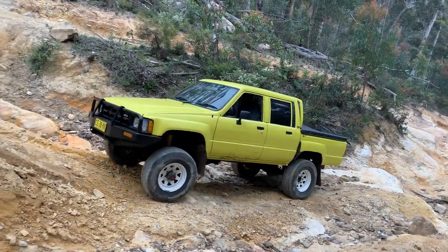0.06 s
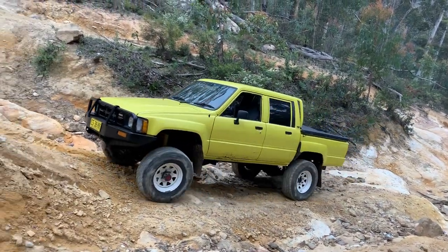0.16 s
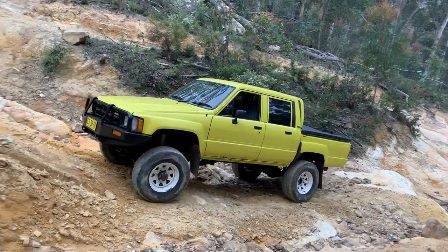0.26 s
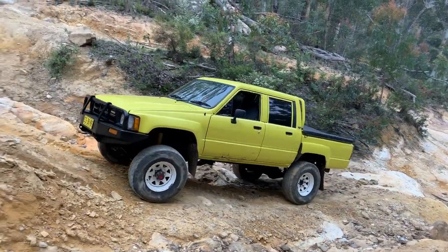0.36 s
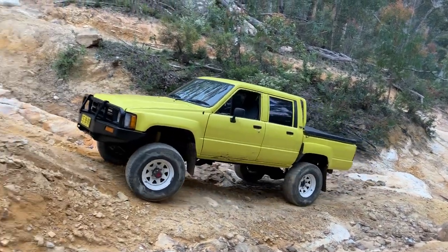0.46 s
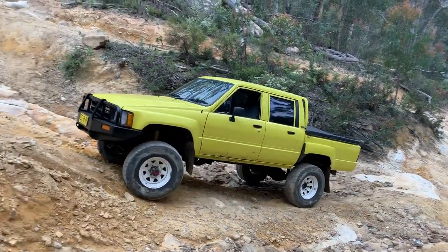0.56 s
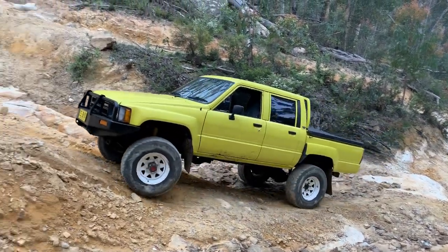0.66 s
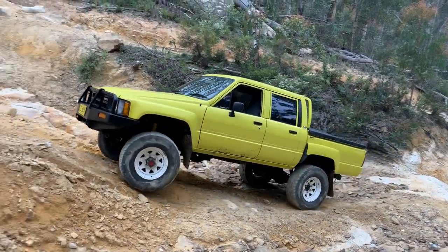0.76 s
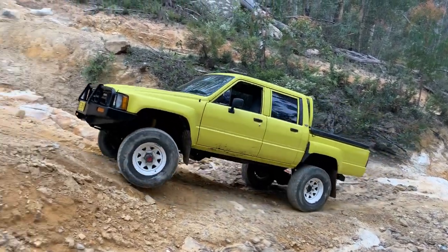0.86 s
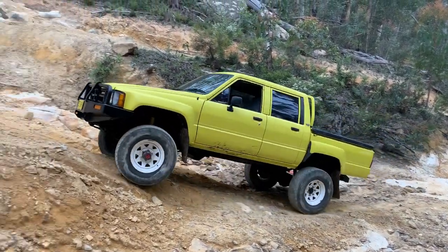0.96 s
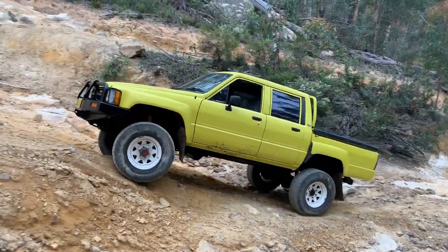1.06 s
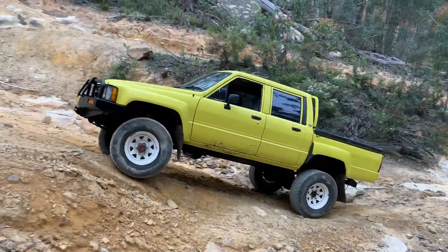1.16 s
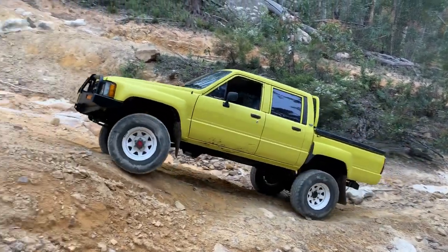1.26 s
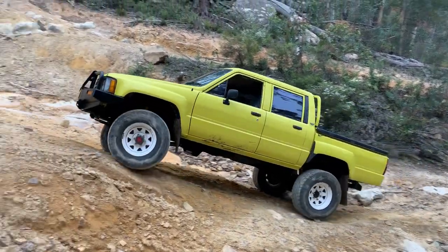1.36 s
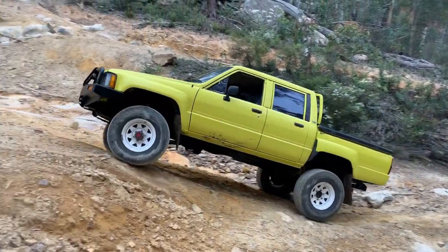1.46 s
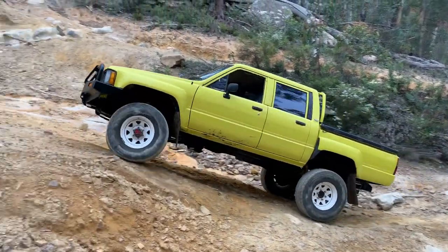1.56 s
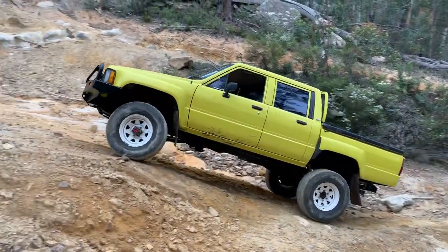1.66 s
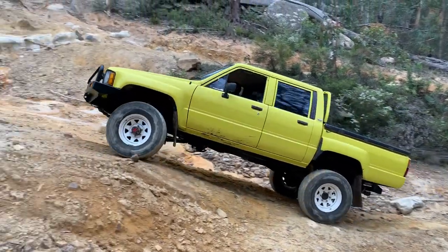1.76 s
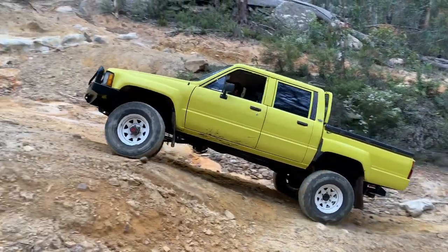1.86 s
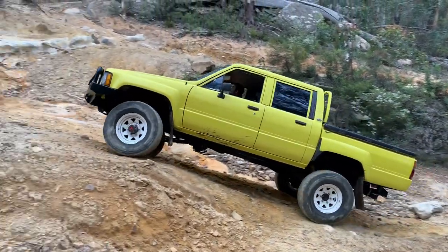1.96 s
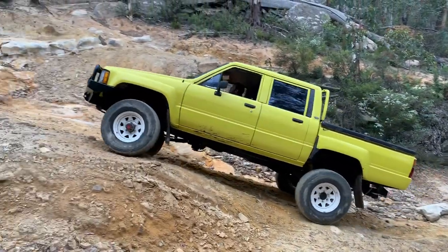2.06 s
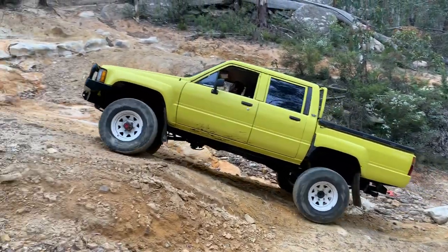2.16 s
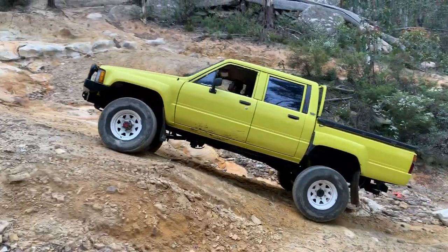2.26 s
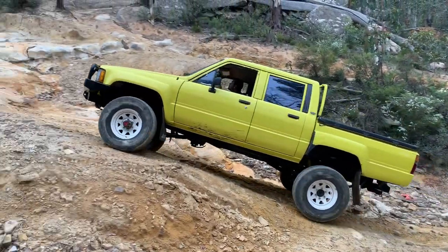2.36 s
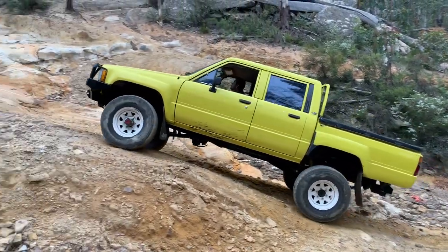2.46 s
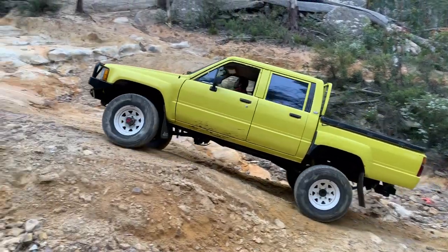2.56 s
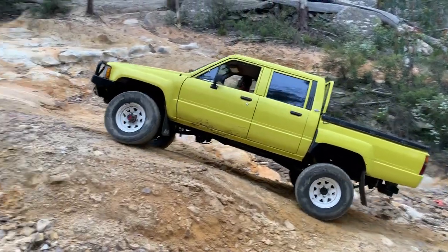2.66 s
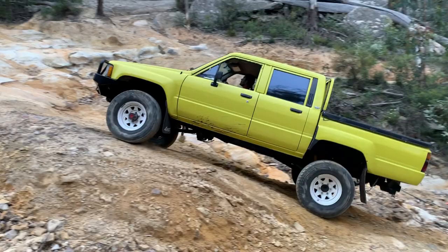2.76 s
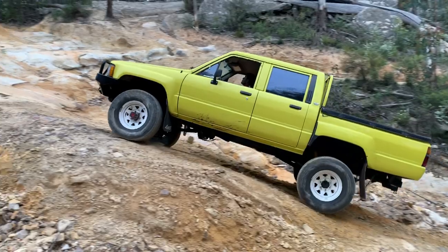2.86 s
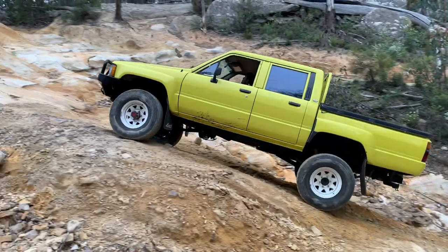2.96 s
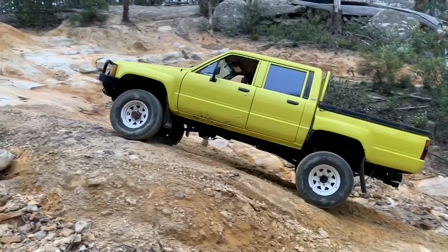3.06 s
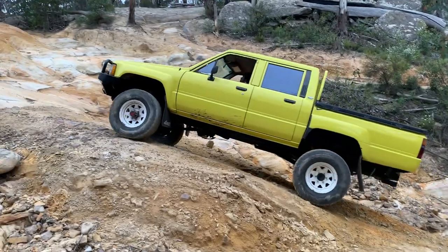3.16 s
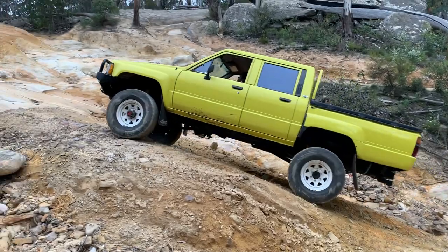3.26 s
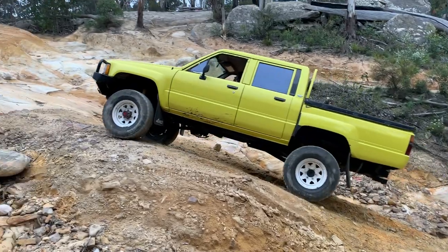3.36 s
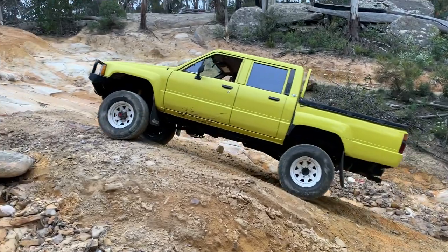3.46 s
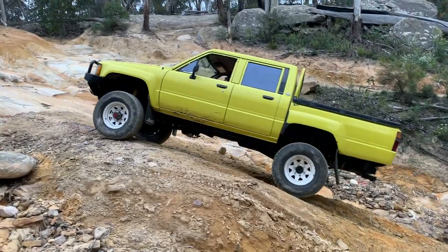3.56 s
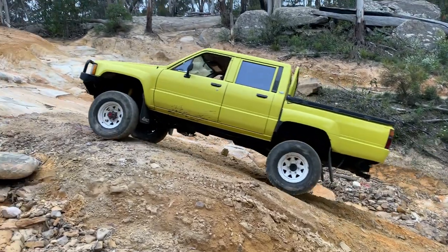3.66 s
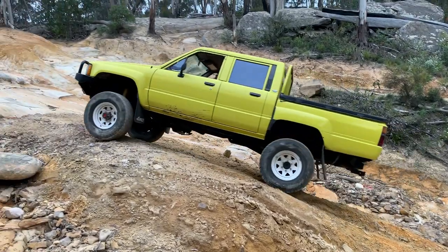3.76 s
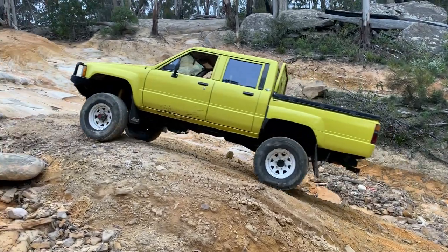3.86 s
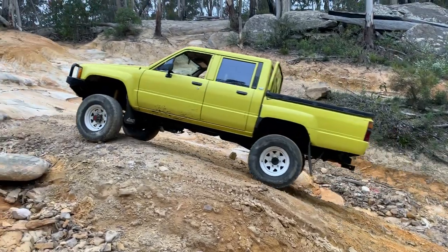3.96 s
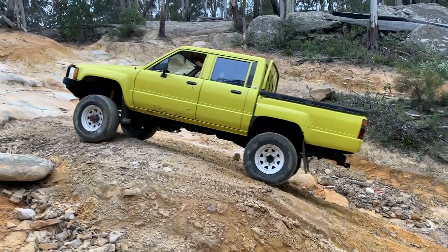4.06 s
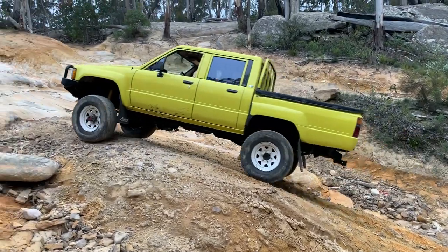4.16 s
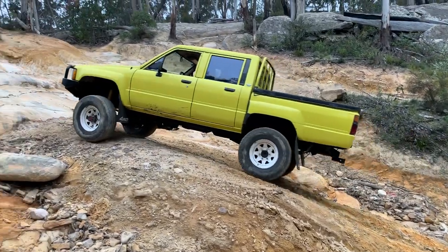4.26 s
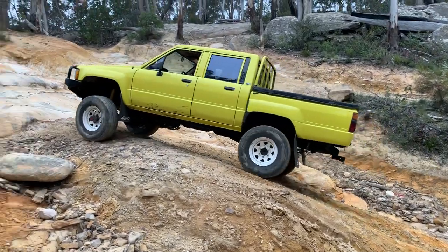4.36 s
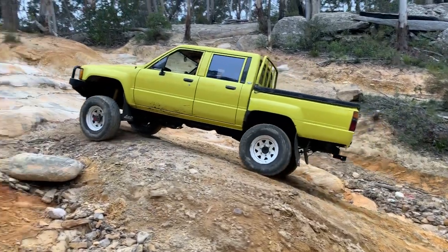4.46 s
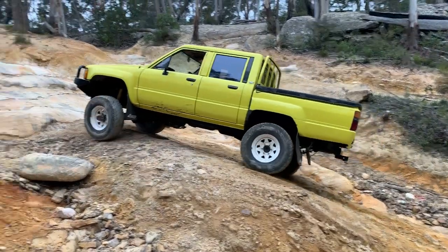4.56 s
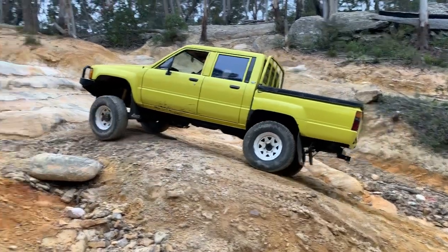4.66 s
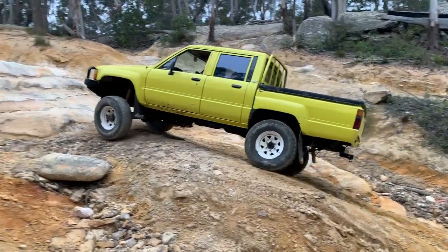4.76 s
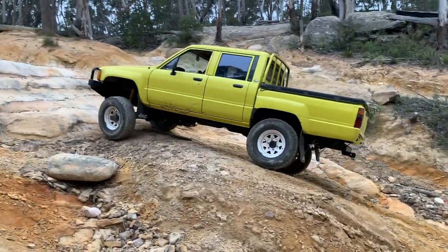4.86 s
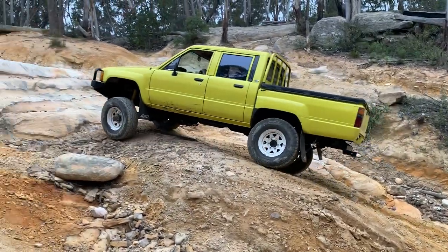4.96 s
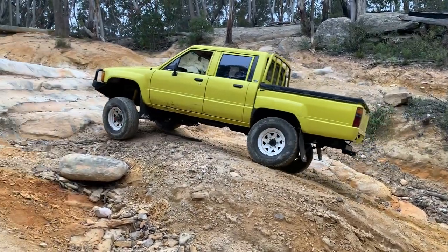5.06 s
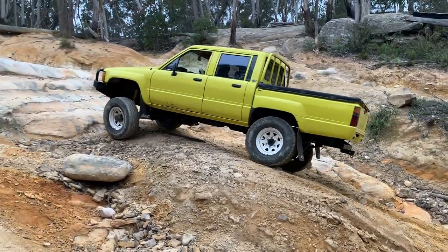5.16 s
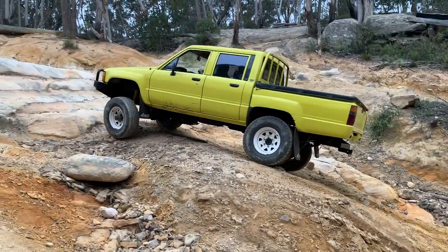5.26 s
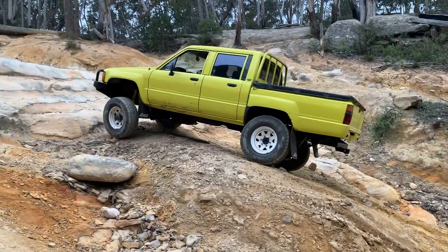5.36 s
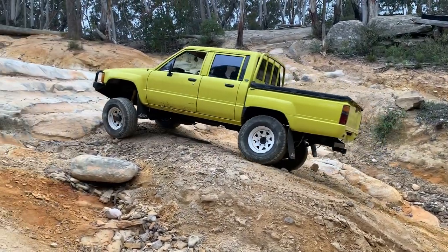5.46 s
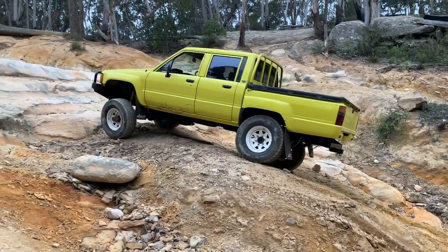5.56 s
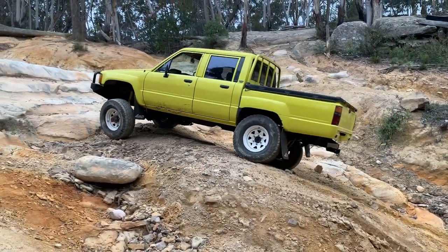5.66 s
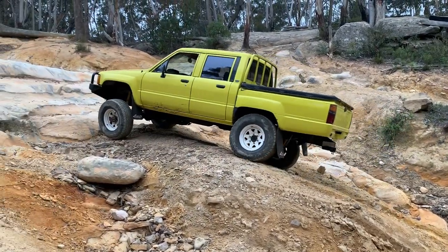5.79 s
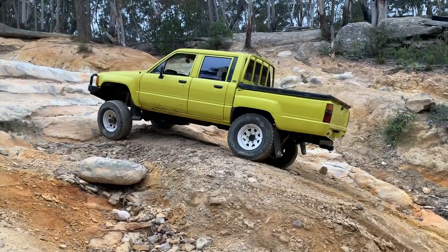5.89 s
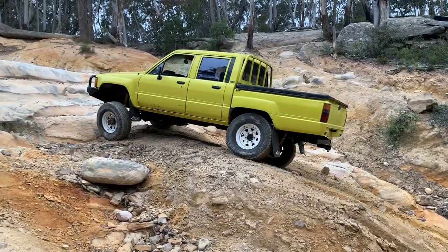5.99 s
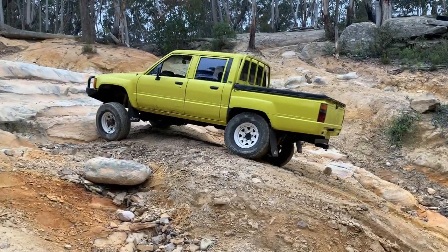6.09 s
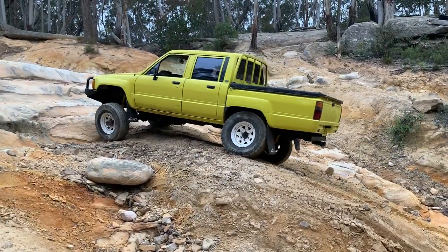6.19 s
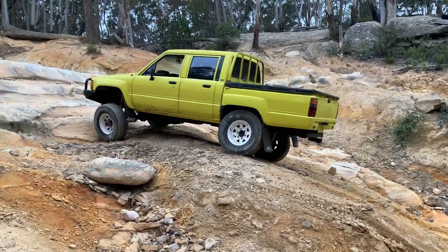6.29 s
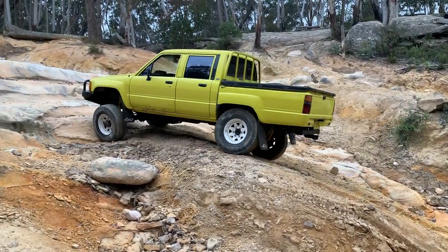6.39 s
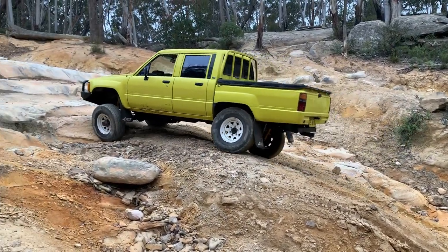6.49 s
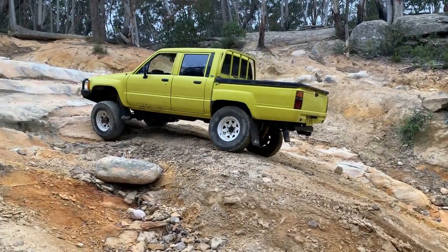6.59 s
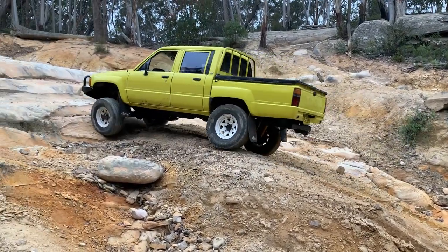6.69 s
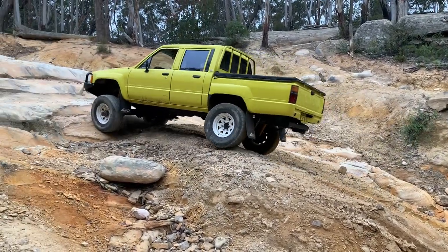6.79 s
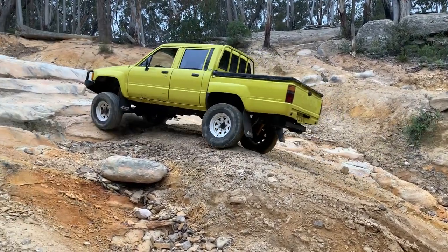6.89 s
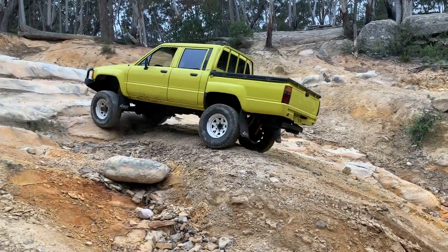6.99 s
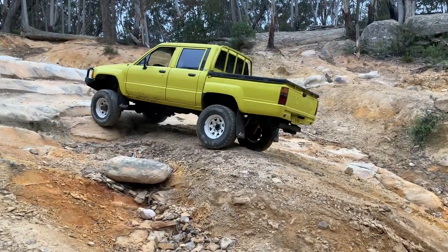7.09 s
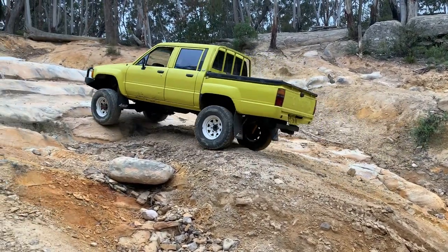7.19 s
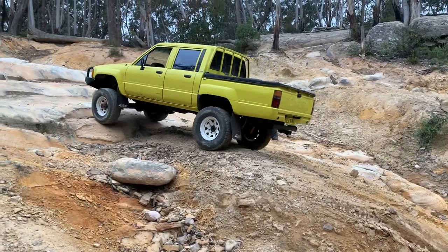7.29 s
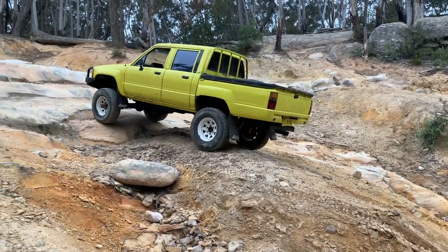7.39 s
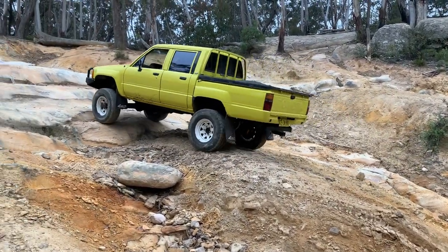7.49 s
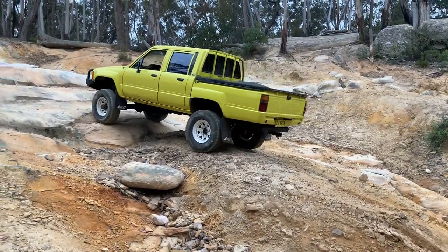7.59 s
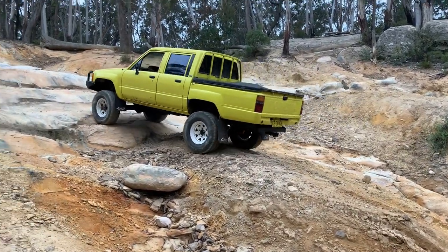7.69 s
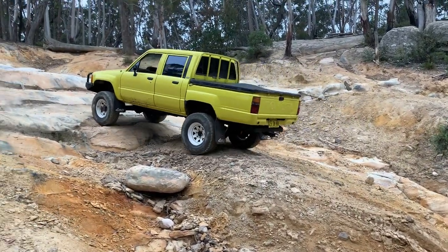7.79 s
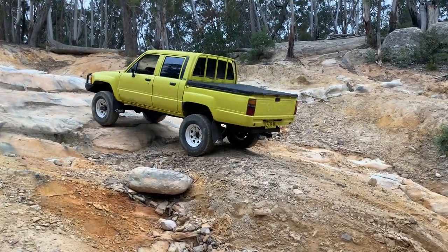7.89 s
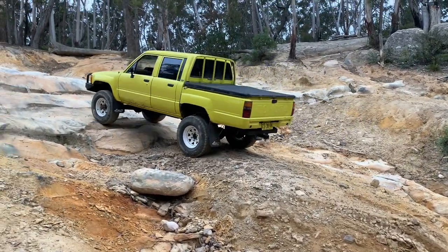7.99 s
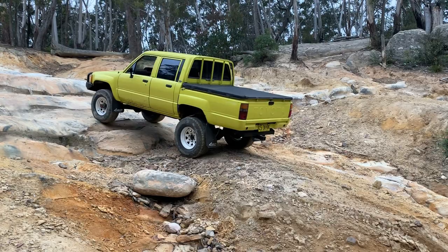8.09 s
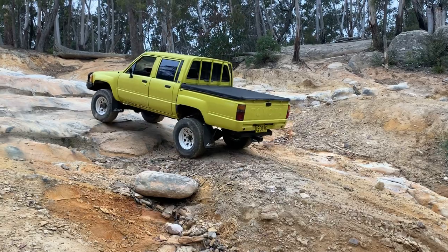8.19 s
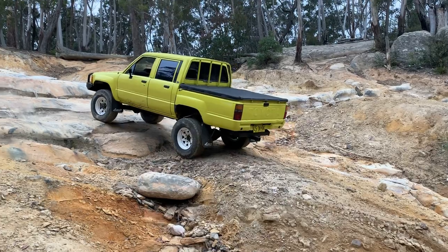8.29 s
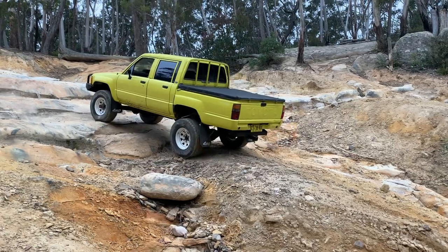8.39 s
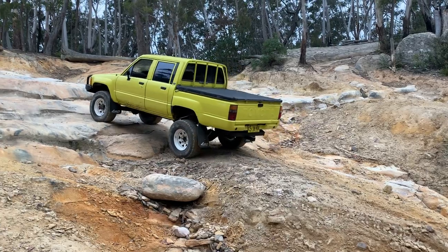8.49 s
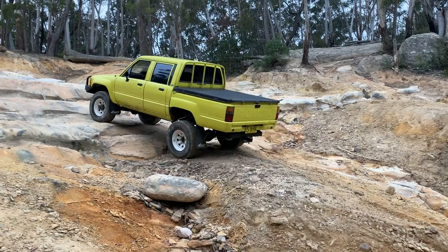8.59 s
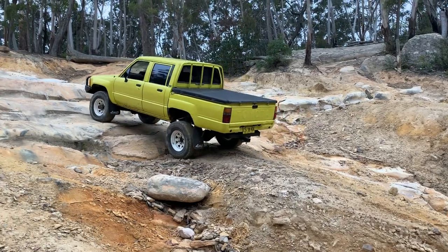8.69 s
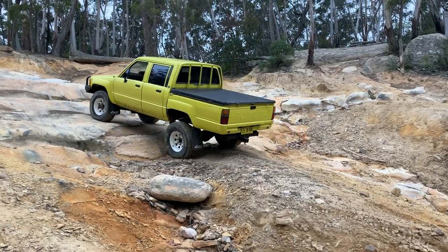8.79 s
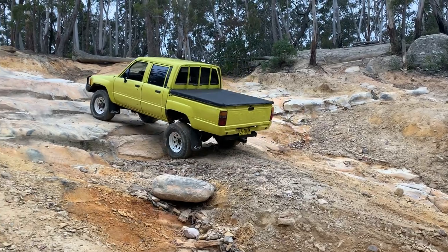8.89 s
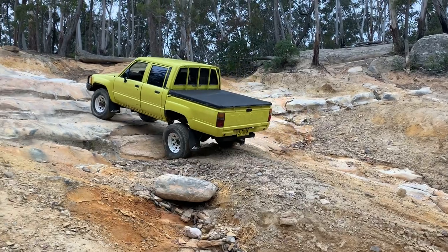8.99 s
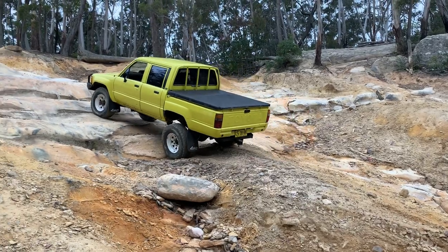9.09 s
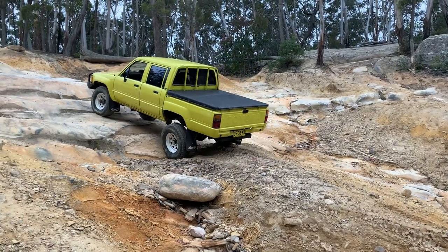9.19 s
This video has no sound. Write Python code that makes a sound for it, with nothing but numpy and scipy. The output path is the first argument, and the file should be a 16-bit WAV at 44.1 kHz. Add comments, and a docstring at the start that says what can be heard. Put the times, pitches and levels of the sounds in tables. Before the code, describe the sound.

Open-air, close stereo pickup of an old four-cylinder truck climbing rock, about six metres away. From 0 s the engine pulls hard: a thick low exhaust boom with buzzing overtones, rattling covers, gritty clatter and airy hiss. Dull tyre thuds and a cluster of stone knocks come at 0.6-1 s. Revs surge and waver between 1.9 and 3.2 s, with scrapes of grit near 1.9, 2.1 and 3.1-3.4 s. From 3.6 s the throttle eases and pitch slides down, reaching a lumpy near-idle around 5-5.3 s with low pipe burbles and valve ticks. At 5.6-5.8 s the suspension cracks and clunks, ringing metallically. The engine picks up, dips at 6.5 s, then lugs away from 6.9 s at moderate revs, slightly more distant, with faint high intake whistle, light driveline clinks, stone knocks and scrapes near 7.1, and final knocks at 8.6-8.9 s. It is still running at 9.2 s.

```python
"""Truck climbing a rock step

A four-cylinder truck, some six metres from a stereo pair, pulls up a sandstone step, drops almost to idle
and lugs away. Each firing drives the exhaust boom and its overtones, shakes the body, rings loose covers
and sets off bursts of noise for clatter and hiss; gliding tones make the faint intake whistle.
Tyres thud, flick stones and scrape; the pipe burbles, the driveline clinks and struck modes make the
suspension clunk. The noises are partly unalike at the two ports, by an amount that varies with frequency."""
import sys
import numpy as np
from scipy import signal
from scipy.fft import rfft, irfft, next_fast_len
from scipy.io import wavfile
from scipy.ndimage import uniform_filter1d, map_coordinates

SR = 44100
rng = np.random.default_rng(int(sys.argv[2]) if len(sys.argv) > 2 else 0)


def store_wav(level_fs):
    """Save 16-bit WAV to argv[1]."""
    pcm = np.round(np.clip(np.atleast_2d(level_fs), -1, 1) * 32767)
    wavfile.write(sys.argv[1], SR, pcm.T.astype(np.int16))


N = 407484
T = np.arange(N) / SR
SIZE = next_fast_len(N + SR // 4, real=True)
BIN_HZ = np.arange(SIZE // 2 + 1) * SR / SIZE

# Engine speed: (time [s], firing rate [Hz])
FIRING_RATE = [(0.0, 49.08), (0.37, 47.1), (0.56, 48.33), (1.4, 48.87), (2.03, 55.62), (2.22, 51.93),
               (2.55, 57.14), (2.89, 51.33), (3.12, 53.86), (3.62, 51.39), (4.25, 43.79), (4.64, 41.17),
               (5.06, 29.78), (5.3, 28.0), (5.79, 31.75), (6.19, 33.02), (6.51, 30.49), (6.86, 37.03),
               (7.34, 37.26), (7.57, 35.85), (7.99, 40.37), (8.65, 36.34), (8.81, 37.82), (9.24, 36.92)]
# Accelerator, up the step, off on the crest, lugging on: (time [s], throttle opening [0-1])
THROTTLE_OPENING = [(0, 0.84), (.35, 0.67), (1, 0.88), (1.9, 0.84), (2.6, 0.72), (3.2, 0.75), (3.65, 0.57),
                    (4.15, 0.15), (4.8, 0.04), (5.3, 0.08), (5.85, 0.42), (6.5, 0.21), (6.9, 0.63),
                    (7.6, 0.67), (8.1, 0.62), (9.24, 0.52)]
# The truck passes, then drives away: (time [s], distance [m])
TRUCK_DISTANCE = [(0, 5.74), (3, 6), (5, 5.7), (7, 7.8), (9.24, 10.5)]
# Unequal strength of the four cylinders: (level [dB])
CYLINDER_LEVELS = [-1.13, -1, -0.45, -2.3]

# Low exhaust resonances, carrying the firing rate and its octave: (frequency [Hz], gain [dB])
BOOM_RESPONSE = [(28, -12.5), (37, -9), (43.3, -16.5), (47.5, -4.5), (52, -0.5), (57, 0), (65, -10),
                 (74, -13), (80, -13.5), (86, -15), (96, -15.5), (106, -11)]
# Exhaust pipe response to the higher overtones: (frequency [Hz], gain [dB])
PIPE_RESPONSE = [(85, 25.5), (92, 22), (101, 6), (118, 0), (143, 2), (157, 7.5), (167, 9), (182, 11),
                 (196, 3.5), (212, 2), (225, 1), (238, 7.5), (252, -2.5), (270, -4.5), (295, -4.5),
                 (320, -6.5), (340, -12.5), (362, 0.5), (385, -7.5), (410, -12), (437, -4), (490, -11),
                 (540, -10), (640, -20)]
# Overtones of a gas pulse, from the third upwards: (level [dB])
OVERTONE_LEVELS = [0.86, -0.77, -1.5, 1.3, -3.5, -1.7, -2.4, -3.5, -2.7, -4, -5.5]
# Swell of the fourth overtone and of those from the sixth up: (time [s], fourth [dB], upper [dB])
OVERTONE_SWELLS = [(0, -2.5, -7), (.5, 1.5, -0.5), (1.2, 3, 4), (1.6, 1, 1), (2.4, -4.5, 0.5),
                   (2.9, -0.5, 4.5), (3.3, -8, 3), (3.8, 0.5, 5), (4.2, 2, -9), (5, 2.5, -4), (6.2, 0, 1.5),
                   (7, 2, 1), (8.2, -1.5, 2.5), (8.9, 7.5, -0.5), (9.24, 6, 1)]
# Half orders of the firing rate, from unequal cylinders: (frequency [Hz], gain [dB])
HALF_ORDER_RESPONSE = [(45, 10), (56, 9), (75, 3), (97, 3), (125, -6), (220, 0), (280, -6.5), (450, -9)]

# Noise colours of exhaust, body, block and air: (frequency [Hz], relative density [dB per Hz])
RUMBLE_COLOUR = [(18, -27), (35, -9), (75, 2), (110, -2.5), (135, -0.5), (200, -1), (260, -13), (400, -44)]
BODY_COLOUR = [(190, 6.5), (260, -1.5), (320, 2), (360, 0), (410, 5), (440, 2.5), (480, 2), (555, 5),
               (590, -0.5), (640, -13.5), (900, -15.5)]
CLATTER_COLOUR = [(400, -29), (650, -2), (850, 3.5), (1250, 4), (1600, 4), (1850, -1), (2050, 2.5),
                  (2550, 2.5), (3000, -4.5), (3350, -7), (3800, -5.5), (4500, -8.5), (7000, -10),
                  (12000, -17)]
HISS_COLOUR = [(2500, -30), (4500, 1), (6500, 6.5), (7300, 4), (8200, 11), (9200, 6.5), (11000, 5.5),
               (13200, 2.5), (15000, 4.5)]
# Resonances of block and covers: (frequency [Hz], half width [Hz], level against the clatter [dB])
BLOCK_MODES = [(1075, 34, -8), (1365, 42, -10), (1546, 28, -4.5), (1693, 24, 1), (1840, 18, 1),
               (2610, 36, -11), (3630, 60, -9)]
# Loose covers and brackets: (frequency [Hz], level [dB], t60 [s])
COVER_MODES = [(765, -5, 0.04), (969, -8.5, 0.06), (1190, -7.5, 0.049), (1517, -4.5, .04), (1707, -5, .04),
               (1857, 1, 0.058), (2160, -4, 0.054), (2513, -6.5, 0.039), (2898, -7.5, 0.061)]
# Colours of valve tick and closed-throttle rasp: (frequency [Hz], relative density [dB per Hz])
TICK_COLOUR = [(1500, -12), (1900, 7), (2150, 6.5), (2600, -16), (2900, -14)]
RASP_COLOUR = [(370, -9), (410, -2.5), (440, -4.5), (470, -5.5), (520, -4), (560, 2.5), (585, -7.5),
               (620, -13)]

# Dull thuds of tyres dropping off ledges: (time [s], level [dB], frequency [Hz])
TYRE_THUDS = [(.59, -14, 200), (.932, -20, 296), (.972, -18, 335), (6.125, -22, 240), (6.175, -20, 218),
              (6.63, -25.5, 390), (6.725, -23, 290), (7.135, -30, 320), (7.187, -26, 242),
              (7.46, -28.5, 460), (8.576, -25.5, 303), (8.843, -19, 205), (8.878, -28, 219)]
# Stones under the tyres: (time [s], knock level [dB], knock t60 [s], snap level [dB], relative pitch [ratio])
STONE_KNOCKS = [(0.877, -22, 0.023, -52, 0.87), (.926, -28, 0.064, -58, 0.66),
                (.944, -28.5, 0.08, -60, 1.2), (.956, -27, .06, -60, .85), (.966, -27, 0.072, -60, 1.7),
                (1.853, -27, 0.056, -50, 1.2), (1.93, -24.5, 0.072, -44, 1.05), (2.117, -28, 0.1, -58, 1.8),
                (2.138, -30, 0.081, -56, .7), (3.41, -29, 0.04, -50, 1), (5.298, -40, 0.025, -54, 1.6),
                (6.012, -35, .04, -60, 1.5), (6.115, -32, .06, -60, 1.46), (6.199, -36, .03, -57, 1.9),
                (6.396, -31, 0.067, -60, 1.22), (6.947, -38, 0.037, -60, 1.2),
                (7.072, -28, 0.069, -42, 0.93), (7.089, -29, 0.11, -44, .95), (7.463, -35, 0.054, -58, 0.7),
                (8.118, -37, 0.052, -55, 1.2), (8.574, -27.5, 0.04, -32, 1.06),
                (8.579, -25.5, 0.043, -50, 1), (8.59, -35, 0.076, -43, 1.1), (8.879, -34, .04, -58, 1.3)]
# Colours of a stone's knock and snap: (frequency [Hz], relative density [dB per Hz])
STONE_COLOUR = [(150, -31), (350, 14.5), (550, -6), (800, 9), (1200, -0.5), (1800, -7), (3500, -40),
                (12000, -20)]
SNAP_COLOUR = [(2000, -27), (4500, -14), (5500, 3), (6500, -9), (8500, -16), (15000, -24)]
# A stone's own resonances: (frequency [Hz], half width [Hz], level against the knock [dB])
STONE_MODES = [(805, 31, 2), (1226, 35, 8)]
# Tyres scraping on rock: (time of peak [s], half length [s], grit level [dB], sprayed sand level [dB])
TYRE_SCRAPES = [(0.96, 0.04, -35.5, -60), (1.933, 0.059, -27.5, -45), (2.137, 0.045, -30, -58),
                (2.23, 0.065, -36, -59), (3.082, 0.045, -39, -55), (3.366, 0.065, -35.5, -59),
                (7.078, 0.04, -34.5, -42), (7.3, 0.12, -41.5, -49), (8.86, 0.037, -42, -58),
                (9.009, 0.016, -50, -43.5)]
# Colours of crushed grit and sprayed sand: (frequency [Hz], relative density [dB per Hz])
GRIT_COLOUR = [(120, 5), (300, 12), (650, 6.5), (1300, 7), (2200, 2.5), (3100, -2), (3800, -1), (5000, -15),
               (9000, -23), (15000, -28)]
SAND_COLOUR = [(3000, -14), (5500, 7), (8500, 2), (14000, -7)]

# Intake whistles, levels before sag: (start [s], length [s], first pitch [Hz], last pitch [Hz], level [dB])
INTAKE_WHISTLES = [(1.75, .95, 6550, 7000, -60), (2.65, 0.82, 6950, 6500, -67),
                   (5.554, 1.2, 4720, 4650, -55), (6.478, 1.74, 4140, 4410, -45)]
# Colour of air drawn into the intake: (frequency [Hz], relative density [dB per Hz])
INTAKE_COLOUR = [(3500, 1), (5500, 6.5), (7500, -4), (14000, -3)]
# Burbles in the pipe as the engine falls to idle: (time [s], level [dB], frequency [Hz])
PIPE_BURBLES = [(4.905, -32, 122), (4.95, -18.5, 135.4), (4.975, -16.5, 110), (5.025, -25, 122),
                (5.065, -24, 95), (5.08, -19, 125), (5.185, -23, 124)]
# Light clinks as the driveline takes up slack: (time [s], level [dB], frequency [Hz])
DRIVELINE_CLINKS = [(5.09, -33, 1840), (6.785, -30.5, 1840), (7.325, -30, 1840), (7.745, -35, 1835),
                    (8.775, -31, 1860)]
# Suspension blows and rebounds: (time [s], level [dB], relative crack level [dB], contact time [s])
SUSPENSION_CLUNKS = [(5.615, -25, -10, 0.00059), (5.648, -24.5, 3, .0003), (5.654, -16.5, -5.5, 0.00026),
                     (5.668, -23, -14, 0.00045), (5.697, -15.5, -22, 0.0035), (5.741, -14, -25, 0.0021),
                     (5.763, -25, -22, 0.001), (6.137, -36.5, -2, .001), (6.669, -29.5, -6, 0.0013)]
# Modes of the chassis, before detuning: (frequency [Hz], level [dB], t60 [s])
CHASSIS_MODES = [(205, -10, 0.36), (241, -3, 0.46), (263, -3, 0.24), (317, -5.5, 0.29), (403, -1.5, 0.21),
                 (446, 0.5, 0.22), (498, 2, 0.14), (534, -3, 0.09), (586, -8, .16), (968, -9, 0.14),
                 (1160, -8, 0.092), (1223, -12, 0.14), (1525, -17, 0.1)]
# Colour of a crack: (frequency [Hz], relative density [dB per Hz])
CRACK_COLOUR = [(150, -9), (400, 16.5), (1000, -13), (2000, -4), (3200, -15.5), (4500, -15.5), (7000, -26),
                (15000, -25)]

# Likeness of the noises at the two microphone ports: (frequency [Hz], likeness [0-1])
PORT_LIKENESS = [(200, 0.95), (600, 0.91), (800, 0.61), (1300, 0.95), (1900, 0.38), (2600, 0.12),
                 (3400, 0.14), (7500, 0.14), (8200, 0.71), (15000, 1)]
# Level between the ports: (frequency [Hz], left minus right [dB])
PORT_TILT = [(60, -1.5), (150, -.9), (550, -.3), (850, 4), (1100, 2.7), (1950, 6), (2500, 1.2), (3000, 3.5),
             (4500, 0), (7700, 1), (8300, -1.8), (10000, 0)]
# Phase between the ports: (frequency [Hz], left lead [rad])
PORT_LEAD = [(1400, .1), (1800, 1.5), (2400, 6.3), (2900, 8.1), (7000, 8.5), (8000, 7), (9400, 6.1),
             (11400, 3.1), (13400, 0), (15300, -2.5)]

# Firing rate and distance at which the full-throttle levels of the laws hold
PULL_HZ, NEAR_M = 50, 6
# Laws: (full-throttle level [dB], loss with throttle shut [dB], gain per octave of speed [dB],
# loss per doubling of distance [dB])
BOOM_LAW = (-13, 6, 7.5, 6)
# the tailpipe swings towards the listener, so octave and drone hold their level
OCTAVE_LAW = (-9, 18.5, -4.5, -1)
DRONE_LAW = (-33.5, -0.5, 20, 0.5)
RUMBLE_LAW = (-33, 2, 5, 2.5)
HALF_LAW = (-43.5, 9, -0.5, 3)
BODY_LAW = (-33, 7, 1, 13)
CLATTER_LAW = (-35, 6, 5.5, 6)
HISS_LAW = (-43, 2.5, 9.5, 5)
COVER_LAW = (-41, 4.5, -1, 2)

# What a fully shut throttle takes from the high and from the odd overtones
DULL_DB_PER_OCTAVE, DULL_ABOVE_HZ, ODD_LOSS_DB = 74, 195, 7
COVER_BOUNCE_DB = -3  # a cover chatters again within the same firing
TICK_DB, RASP_DB = -53, -36.5  # tick at 33 firings/s; rasp with the throttle shut at 43 firings/s
WHISTLE_ATTACK_S, WHISTLE_RELEASE_S, WHISTLE_SAG_DB_PER_S = 0.48, 0.21, 7
WHISTLE_WAVER_HZ, INTAKE_DB = 35, -8  # rms waver; rush relative to the whistle before it sags
THUD_T60_S, BURBLE_T60_S, CLINK_T60_S = 0.089, 0.11, 0.092
TOP_HZ = 15400


def undb(db):
    """Decibels to gain."""
    return 10 ** (np.asarray(db) / 20)


def unit(x):
    """Scale to rms 1."""
    return x / np.sqrt(np.mean(x ** 2))


def curves(table):
    """Interpolate the columns of a timed table at every sample."""
    s, *columns = np.transpose(table)
    return [np.interp(T, s, column) for column in columns]


def at(points, hz):
    """Read (frequency [Hz], value) points on a log-frequency axis."""
    f, value = np.transpose(points)
    return np.interp(np.log(hz + 1), np.log(f), value)


def noise(points, modes=()):
    """Coloured noise, rms 1, partly unalike at the two ports by an amount that varies with frequency."""
    # beyond the end points the colour falls 50 dB per factor e in frequency
    outside = np.abs(np.log((BIN_HZ + 1) / np.clip(BIN_HZ, points[0][0], points[-1][0])))
    gain = undb(at(points, BIN_HZ) - 50 * outside)
    peaks = sum(undb(db) / (1 + ((BIN_HZ - hz) / width) ** 2) for hz, width, db in modes)
    gain = gain * (1 + peaks)
    like = np.clip(at(PORT_LIKENESS, BIN_HZ), 0, 1)
    white = rfft(rng.standard_normal((2, SIZE)))
    mid, side = white * np.sqrt([1 + like, 1 - like]) * gain
    return unit(irfft(np.array([mid + side, mid - side]), SIZE)[:, :N])


def walk(hz):
    """Smoothed chance of rms 1, drawn afresh about hz times a second."""
    k = int(SR / hz)
    steps = np.repeat(rng.standard_normal(N // k + 1), k)
    return unit(uniform_filter1d(uniform_filter1d(steps, k), k)[:N])


def fade(t60):
    """Half a second of exponential decay, 60 dB down after t60 seconds."""
    return np.exp(-np.log(1000) * T[:SR // 2] / t60)


def add(out, s, sound):
    """Mix a sound in at a time in seconds."""
    i = int(s * SR)
    out[:, i:i + sound.shape[-1]] += sound[..., :N - i]


def per_firing(turns, scatter_db):
    """Strength of the current firing: its cylinder's share and some chance."""
    k = np.floor(turns).astype(int) + 2
    return undb(np.resize(CYLINDER_LEVELS, N)[k] + scatter_db * rng.standard_normal(N)[k])


def bursts(turns, lag, rise, decay, steady, scatter_db):
    """Envelope swelling at each firing and dying away, so fast firings merge (lag in firings, times in s)."""
    turns, t = turns - lag, T[:SR // 8]
    starts = np.diff(np.floor(turns), prepend=np.floor(turns[0]))
    kicks = starts * per_firing(turns, scatter_db) ** 2
    pulse = (1 - np.exp(-t / rise)) ** 2 * np.exp(-t / decay)
    power = np.abs(signal.fftconvolve(kicks, pulse)[:N])
    power = power / uniform_filter1d(power, SR // 4)  # leaves the longer-term level to the laws
    return np.sqrt((power + steady) / (1 + steady))


def loudness(law, hz):
    """Level in dB of an engine sound, from throttle, speed and distance."""
    full_db, shut_db, speed_db, far_db = law
    (throttle,), (metres,) = curves(THROTTLE_OPENING), curves(TRUCK_DISTANCE)
    near_db = full_db - shut_db * (1 - throttle) + speed_db * np.log2(hz / PULL_HZ)
    return near_db - far_db * np.log2(metres / NEAR_M)


def thumps(table, t60):
    """Soft pushes, each ringing briefly in one resonance and a weaker one above it."""
    out, t = np.zeros((2, N)), T[:SR // 2]
    for s, db, hz in table:
        ring = np.sin(2 * np.pi * hz * t) + 0.15 * np.sin(2 * np.pi * 1.7 * hz * t)
        add(out, s, undb(db) * (1 - np.exp(-t / 0.0028)) * fade(t60) * ring)
    return out


def exhaust(turns, hz):
    """A smooth boom, its octave and overtones sweep through the resonances of the pipe, over a noisy rumble."""
    shut = np.clip(1 - curves(THROTTLE_OPENING)[0], 0, 1)
    angle = 2 * np.pi * (turns + .004 * walk(35))
    # the boom's phase slides later as the engine speeds up, fastest near 37 firings/s
    late = .8 + 3.3 * np.arctan((hz - 37) / 7)
    boom_db = loudness(BOOM_LAW, hz) + at(BOOM_RESPONSE, hz) + 0.5 * walk(26.2)
    boom = undb(boom_db) * np.cos(angle - late)
    octave_db = loudness(OCTAVE_LAW, hz) + at(BOOM_RESPONSE, 2 * hz) + 1.04 * walk(25)
    octave = undb(octave_db) * np.cos(2 * angle)

    pipe = 0
    fourth_db, upper_db = curves(OVERTONE_SWELLS)
    for k, db in zip(range(3, 14), OVERTONE_LEVELS):
        # a shut throttle softens the gas pulses, which dulls the high and the odd overtones
        octaves_up = np.clip(np.log2(k * hz / DULL_ABOVE_HZ), 0, .8)
        dull_db = shut ** 2 * (DULL_DB_PER_OCTAVE * octaves_up + ODD_LOSS_DB * (k % 2))
        # the overtones line up in one puff per firing; reflections off the rock loosen the higher ones
        shift = .12 * (k - 2) * (rng.standard_normal() + .4 * walk(1.5)) - .25 * (k - 3)
        swell_db = (k == 4) * fourth_db + (k >= 6) * upper_db
        level_db = db + at(PIPE_RESPONSE, k * hz) - dull_db + swell_db + .5 * walk(9)
        pipe = pipe + undb(level_db) * np.cos(k * angle + shift)

    # uneven cylinders show most when the engine lugs
    lumps = uniform_filter1d(per_firing(turns + .5, scatter_db=.3), SR // 100) ** (42 / hz)
    gusts = bursts(turns, lag=-.15, rise=.003, decay=.009, steady=.9, scatter_db=1.5)
    rumble = noise(RUMBLE_COLOUR) * gusts * undb(loudness(RUMBLE_LAW, hz))
    drone = pipe * undb(loudness(DRONE_LAW, hz))
    return rumble - np.sqrt(2) * (boom + lumps * (octave + drone))


def lope(turns, hz):
    """Unequal cylinders repeat every second firing, which sets faint tones between the overtones."""
    tones = 0
    for k in np.arange(1.5, 9):
        gain = undb(at(HALF_ORDER_RESPONSE, k * hz) + 2 * walk(4))
        tones = tones + gain * np.cos(2 * np.pi * (k * turns + rng.random()) + .5 * walk(3))
    return np.sqrt(2) * tones * undb(loudness(HALF_LAW, hz))


def engine_bay(turns, hz):
    """Firings rattle the body, clatter in the block and puff air; at speed the fan fills the gaps."""
    fan = (hz / 45) ** 4
    shakes = bursts(turns, lag=0.063, rise=0.0034, decay=0.01, steady=fan, scatter_db=1.0)
    knocks = bursts(turns, lag=-.18, rise=.001, decay=.012, steady=.8 + 1.1 * fan, scatter_db=3)
    puffs = bursts(turns, lag=-.25, rise=.007, decay=.0055, steady=.05 + .05 * fan, scatter_db=.9)
    body = noise(BODY_COLOUR) * shakes * undb(loudness(BODY_LAW, hz))
    clatter_gain = undb(loudness(CLATTER_LAW, hz) + walk(600))
    clatter = noise(CLATTER_COLOUR, BLOCK_MODES) * knocks * clatter_gain
    hiss = noise(HISS_COLOUR) * puffs * undb(loudness(HISS_LAW, hz))
    return body + clatter + hiss


def covers(turns, hz):
    """Firings strike the loose covers afresh and they chatter on; which rings loudest keeps changing."""
    kicks = np.diff(np.floor(turns + .12), prepend=0)
    out = 0
    for mode_hz, db, t60 in COVER_MODES:
        # on average two random bounces a firing
        bounces = (rng.random(N) < 2 * hz / SR) * undb(COVER_BOUNCE_DB)
        strikes = (kicks + bounces) * rng.standard_normal(N) * undb(db + 2 * walk(5))
        ring = fade(t60) * np.sin(2 * np.pi * mode_hz * T[:SR // 2])
        out = out + signal.oaconvolve(strikes, ring)[:N]
    return out * undb(loudness(COVER_LAW, hz))


def valves_and_rasp(turns, hz):
    """Valve ticks stand out at low speed; the pipe rasps while a fast engine runs down."""
    throttle, = curves(THROTTLE_OPENING)
    ticks = bursts(turns, lag=-.12, rise=.0007, decay=.005, steady=.04, scatter_db=2)
    overrun = np.clip(1 - throttle, 0, 1) * (hz / 43) ** 4
    valves = noise(TICK_COLOUR) * ticks * undb(TICK_DB) * (33 / hz)
    return valves + noise(RASP_COLOUR) * overrun * undb(RASP_DB)


def thuds():
    """Tyres drop off ledges, each drop a dull, briefly ringing push."""
    return thumps(TYRE_THUDS, THUD_T60_S)


def tyres():
    """Stones knock and snap under the tread; slipping rubber grinds grit and sprays sand in uneven catches."""
    out, knock, snap = np.zeros((2, N)), noise(STONE_COLOUR, STONE_MODES), noise(SNAP_COLOUR)
    steps = np.arange(SR // 2)
    for s, db, t60, snap_db, pitch in STONE_KNOCKS:
        start = rng.integers(N // 2)
        # reading the knock noise faster raises the stone's pitch
        stone = np.array([map_coordinates(port, [start + pitch * steps], order=1) for port in knock])
        add(out, s, undb(db) * fade(t60) * stone + undb(snap_db) * fade(0.027) * snap[:, start + steps])

    grit, sand = np.zeros((2, N))
    for s, length, grit_db, sand_db in TYRE_SCRAPES:
        slip = np.exp(-((T - s) / length) ** 2)
        grit += undb(grit_db) * slip
        sand += undb(sand_db) * slip
    catches = unit(undb(3.2 * walk(450)))
    return out + catches * (grit * noise(GRIT_COLOUR) + sand * noise(SAND_COLOUR))


def whistle(turns):
    """Intake tones swell, glide and sag into a rush of air; the firings chop the tones."""
    tone, rush, waver_hz = 0, 0, WHISTLE_WAVER_HZ * walk(400)
    for s, length, first_hz, last_hz, db in INTAKE_WHISTLES:
        age = np.clip(T - s, 0, length)
        attack = np.minimum(age / WHISTLE_ATTACK_S, 1)
        release = np.minimum((length - age) / WHISTLE_RELEASE_S, 1)
        swell = undb(db) * attack * release
        hz = first_hz + (last_hz - first_hz) * age / length + waver_hz
        sag = undb(-WHISTLE_SAG_DB_PER_S * age)
        tone = tone + swell * sag * np.sin(2 * np.pi * np.cumsum(hz) / SR)
        rush = rush + swell
    chop = bursts(turns, lag=-.12, rise=.002, decay=.0025, steady=.01, scatter_db=1.1)
    tone = np.sqrt(2) * tone * chop * undb(1.8 * walk(7))
    return tone + rush * undb(INTAKE_DB) * noise(INTAKE_COLOUR)


def burbles():
    """Low pipe resonances ring in short pushes as the engine falls to idle."""
    return thumps(PIPE_BURBLES, BURBLE_T60_S)


def clinks():
    """The driveline takes up its slack with light, briefly ringing clinks."""
    return thumps(DRIVELINE_CLINKS, CLINK_T60_S)


def suspension():
    """Blows on the springs crack and ring the chassis; longer, softer contacts favour its low modes."""
    out, crack, t = np.zeros((2, N)), noise(CRACK_COLOUR), T[:SR // 2]
    for s, db, crack_db, contact in SUSPENSION_CLUNKS:
        detune = 1 + 0.013 * rng.standard_normal(len(CHASSIS_MODES))
        ring = 0
        for (f, mode_db, t60), d in zip(CHASSIS_MODES, detune):
            strength = undb(mode_db) / (1 + (f * contact) ** 2)
            ring = ring + strength * fade(t60) * np.sin(2 * np.pi * f * d * t)
        piece = rng.integers(N - SR) + np.arange(len(t))
        snap = undb(crack_db) * fade(0.21) * crack[:, piece]
        add(out, s, undb(db) * (1 - np.exp(-t / contact)) * (0.54 * ring + snap))
    return out


def ports(x):
    """The sound reaches the two microphone ports with unequal level and phase."""
    sides = np.array([[.5], [-.5]])  # half of each difference goes to either port
    level = undb(sides * at(PORT_TILT, BIN_HZ))
    phase = np.exp(1j * sides * at(PORT_LEAD, BIN_HZ))
    return irfft(rfft(x, SIZE) * level * phase, SIZE)[:, :N]


def scene():
    """The firings time the running engine; timed knocks and scrapes come from pipe, driveline and ground."""
    hz, = curves(FIRING_RATE)
    turns = np.cumsum(hz) / SR  # firings so far
    engine = exhaust(turns, hz) + lope(turns, hz) + engine_bay(turns, hz) + covers(turns, hz)
    engine = engine + valves_and_rasp(turns, hz) + whistle(turns) + burbles() + clinks()
    return ports(engine + thuds() + tyres() + suspension())


def record(dry):
    """The recorder cuts the top with a steep low-pass."""
    return signal.sosfilt(signal.ellip(10, .2, 80, TOP_HZ, fs=SR, output="sos"), dry)


dry = scene()
out = record(dry)
store_wav(out)
```